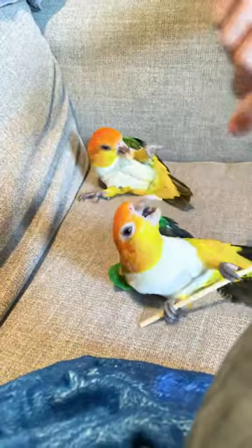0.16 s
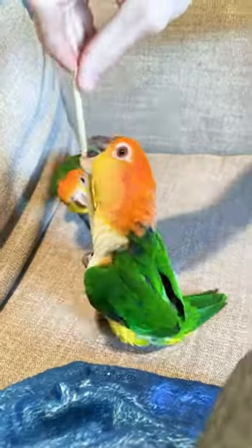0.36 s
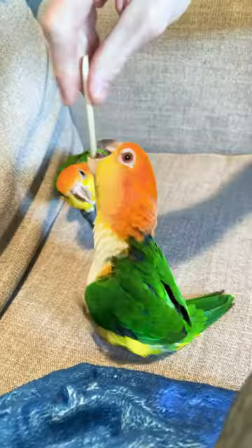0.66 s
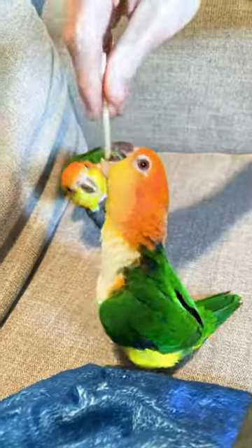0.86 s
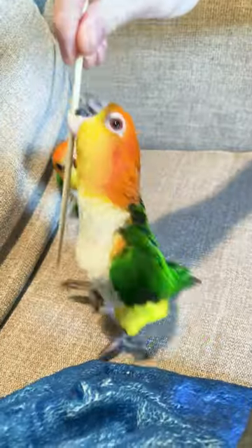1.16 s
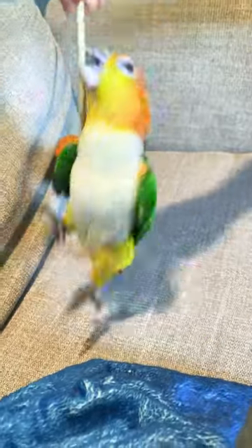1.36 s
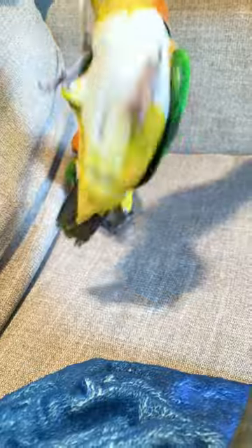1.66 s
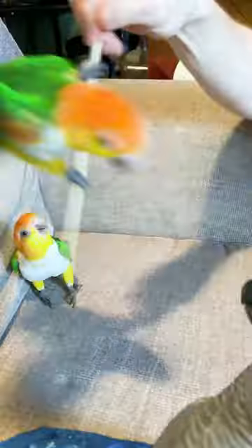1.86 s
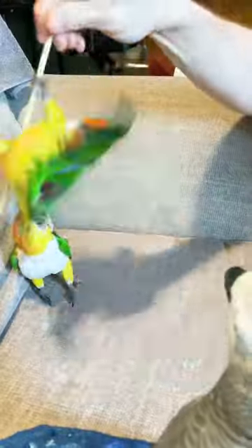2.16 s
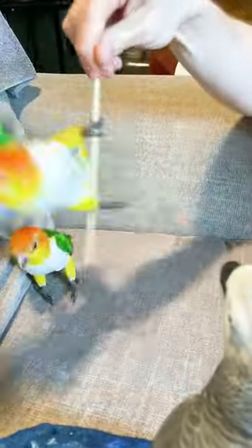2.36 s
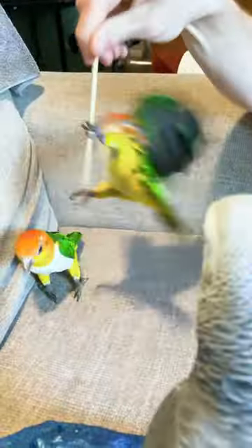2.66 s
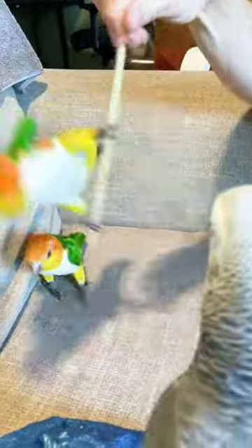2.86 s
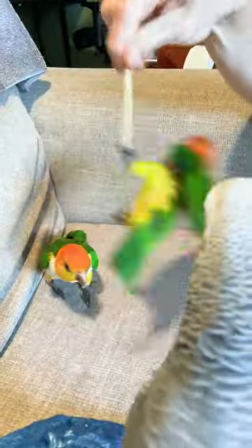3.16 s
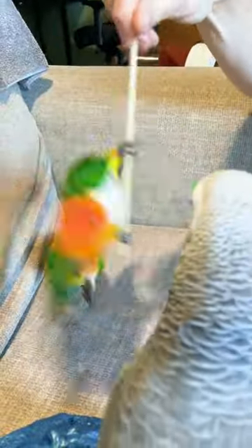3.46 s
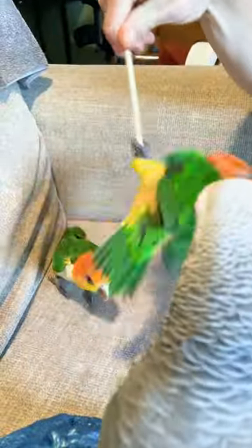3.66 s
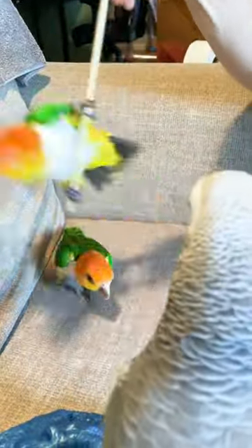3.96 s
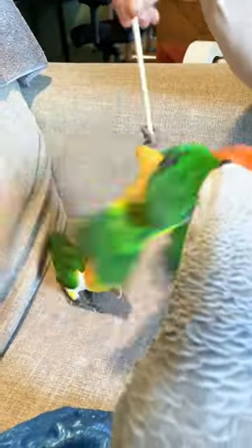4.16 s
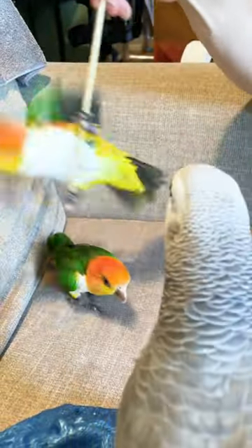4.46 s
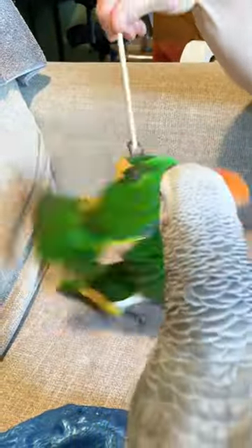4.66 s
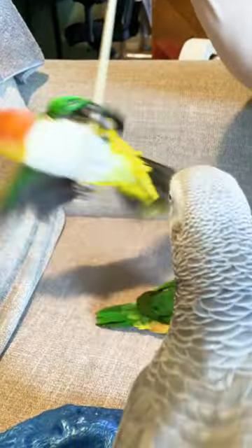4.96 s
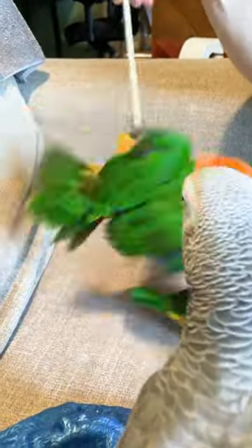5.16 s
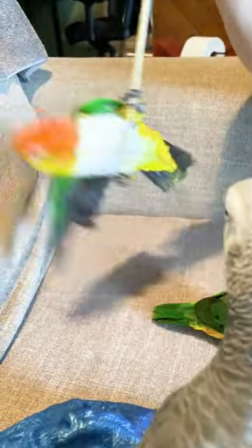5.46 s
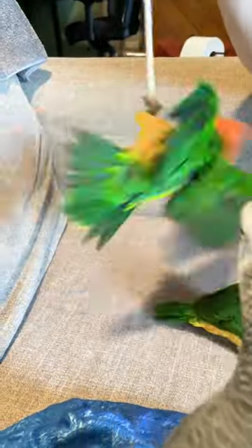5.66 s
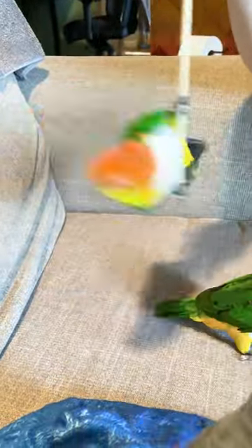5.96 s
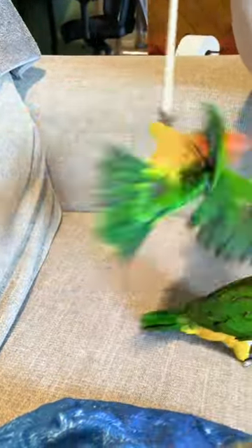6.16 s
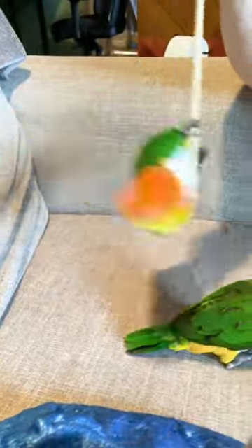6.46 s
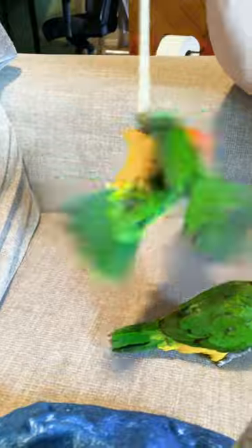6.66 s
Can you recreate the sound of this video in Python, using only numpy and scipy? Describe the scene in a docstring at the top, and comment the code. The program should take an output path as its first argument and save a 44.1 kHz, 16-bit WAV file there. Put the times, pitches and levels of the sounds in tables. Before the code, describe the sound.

Light beak and claw ticks on wood, then a small parrot flapping, with soft bumps on cushions in a quiet room.

```python
"""Small parrots play with a wooden stick held over a sofa; quiet room, faint appliance hum throughout.
First a faint peep. One bird nibbles and climbs the stick: beak and claws tick, plumage slides on cloth.
From 1.9 s it swings from the stick, beating its wings: feathers rustle and zip over the wood, air puffs
reach the microphone, bodies bump the cushions. A thin whine enters at 2.5 s.
After 3 s the wingbeats go on more softly, with scattered scrapes and bumps."""
import sys
import numpy as np
from scipy import signal
from scipy.fft import rfft, irfft
from scipy.io import wavfile
from scipy.ndimage import uniform_filter1d

SR = 44100
rng = np.random.default_rng(int(sys.argv[2]) if len(sys.argv) > 2 else 0)


def waveform_to_disk(signal):
    """Save audio, clipped to [-1, 1], as 16-bit WAV at the path in sys.argv[1]."""
    frames = np.transpose(np.atleast_2d(signal))
    scaled = np.clip(frames, -1, 1) * 32767
    samples = np.round(scaled).astype(np.int16)
    wavfile.write(sys.argv[1], SR, samples)


N = 300762
TIME_S = np.arange(N) / SR

# wing strokes: crest t/s, level/dB, opening/s, folding/s
WINGBEATS = [(1.945, -48, 0.062, 0.062), (2.022, -46.5, 0.045, 0.18), (2.113, -49.5, 0.081, 0.18),
             (2.239, -55, 0.095, 0.061), (2.32, -50, 0.2, 0.071), (2.464, -45, 0.062, 0.085),
             (2.529, -44.5, 0.043, 0.15), (2.605, -53, 0.036, 0.017), (2.735, -52, 0.083, 0.16),
             (2.948, -56, 0.043, 0.16), (3.032, -52, 0.033, 0.064), (3.394, -56.5, 0.1, 0.044),
             (3.951, -58.5, 0.095, 0.12), (4.038, -62, 0.018, 0.091), (4.159, -63.5, 0.11, 0.03),
             (4.279, -63, 0.078, 0.045), (4.445, -59.5, 0.048, 0.032), (4.489, -53, 0.051, 0.049),
             (4.63, -56.5, 0.056, 0.14), (4.739, -56, 0.043, 0.033), (4.962, -56, 0.044, 0.073),
             (5.183, -57, 0.081, 0.079), (5.41, -65.5, 0.093, 0.023), (5.661, -54, 0.082, 0.063),
             (5.781, -59, 0.06, 0.049), (6.149, -53.5, 0.088, 0.12), (6.646, -51.5, 0.081, 0.043),
             (6.751, -50, 0.041, 0.11)]
# plumage sliding on cloth: start t/s, level/dB, length/s
SHUFFLES = [(0.037, -64.5, 0.28), (0.548, -68, 0.16), (0.95, -72.5, 0.2), (1.071, -67.5, 0.35),
            (1.576, -65.5, 0.21), (1.886, -50.5, 0.047), (3.456, -70.5, 0.61), (3.826, -63.5, .1)]
# beak, claw and quill scrapes: crest t/s, rustle level/dB, half-width/s, sizzle level/dB
SCRAPES = [(0.567, -55.5, 0.0082, -72), (0.62, -73, 0.0054, -59), (1.075, -60.5, 0.0067, -41),
           (2.021, -38, 0.0029, -39.5), (2.1993, -37, 0.0021, -55), (2.234, -30, 0.0012, -58),
           (2.316, -36, 0.0012, -55), (2.453, -38, 0.0048, -37), (3.406, -45.5, 0.006, -73),
           (3.959, -42, 0.0069, -72), (4.428, -55.5, 0.013, -58), (4.743, -66, 0.026, -50.5),
           (5.673, -50.5, 0.0064, -70), (6.785, -46.5, 0.0045, -40)]
# feather friction: f/Hz, relative density/dB
FEATHER_SPECTRUM = [(150, 0), (800, -6.5), (1700, -8), (2500, -2.5), (3300, -8.5), (4700, -7.5), (6300, -5),
                    (8800, -7.5), (10500, -.5), (11300, -1.5), (12200, -12), (13500, -24), (15000, -55)]
# feather dragged over an edge: release t/s, level/dB, length/s, final barb rate/Hz, scratch/buzz ratio
ZIPS = [(2.247, -29.5, .017, 2764, 0.52), (2.3265, -27.5, 0.0092, 3142, 0.71),
        (2.834, -35.5, 0.007, 2945, 1.17)]
# beak and claws on the stick: t/s, horn peak/dB, wood re horn/dB, wood f/Hz (set by the grip)
TICKS = [(0.493, -43, -5.5, 1400), (0.495, -47.5, 3.5, 2360), (0.965, -39.5, -11.5, 4000),
         (0.9824, -49.5, 2, 4200), (1.051, -41, -15, 3300), (1.377, -48.5, -4.5, 1550),
         (1.614, -43, -12, 3660), (1.645, -60.5, 11.5, 1280), (1.685, -39.5, -10, 1440),
         (1.703, -43.5, 9, 3540), (2.1898, -43, 9, 1980), (2.3304, -20.5, -32, 2980),
         (2.399, -17, -37, 3640), (2.45, -40, -3, 2300), (2.459, -56, 5, 1450), (2.524, -42, -3, 2520),
         (2.61, -30, -17, 3000), (2.6644, -27.5, -8.5, 1480), (2.766, -30, -23, 2190),
         (3.126, -31, -12, 2680), (3.3158, -31, -6, 2700), (4.404, -52, -1, 3000)]
# stick resonances: multiple of wood f, level/dB, t60/s
STICK_MODES = [(.55, 4, 0.0034), (1, 9.5, 0.0042), (1.85, 15.5, 0.0011)]
# beak and claw resonances: f/Hz, level/dB, t60/s
HORN_MODES = [(5650, -16, 0.0045), (8300, -2, 0.0027), (11100, -4.5, 0.0039)]
# bumps on cushions and hand: t/s, level/dB, f/Hz
BUMPS = [(0.438, -43.5, 233), (0.441, -35, 87), (0.498, -38, 206), (.502, -34.5, 82), (1.069, -38.5, 208),
         (1.825, -42, 415), (2.199, -30.5, 1040), (2.246, -32, 405), (2.459, -27, 814), (2.466, -27.5, 410),
         (2.468, -26.5, 124), (2.524, -31, 363), (2.666, -32.5, 620), (2.677, -37, 465), (2.836, -34, 122),
         (4.04, -39.5, 720), (4.642, -36.5, 643), (4.644, -35, 143), (4.7244, -33, 660), (4.73, -33.5, 108),
         (4.771, -39, 504)]
# air pushed by a wing: crest t/s, level/dB, half-width/s
PUFFS = [(1.905, -35.5, 0.014), (1.945, -37, 0.02), (2.025, -37, 0.028), (2.122, -36.5, 0.023),
         (2.258, -36.5, 0.012), (2.345, -40, 0.019), (2.487, -35.5, 0.018), (2.53, -38, 0.061),
         (2.705, -46.5, 0.12), (2.975, -43.5, 0.037), (4.80, -43.5, 0.019)]
# eddy pressure: f/Hz, relative density/dB
EDDY_SPECTRUM = [(20, -14), (65, 8), (100, -7.5), (200, -13), (400, -31), (1200, -34), (5000, -100)]
# room noise: f/Hz, relative density/dB
ROOM_SPECTRUM = [(20, -6.5), (45, 0), (80, 7.5), (130, 0), (230, -3), (450, -14.5), (900, -22),
                 (2000, -35.5), (8500, -48.5), (11200, -39), (15000, -85)]
# stereo width of room noise: f/Hz, side re mid/dB
ROOM_WIDTH = [(60, -24), (200, -15.5), (620, 2), (2300, -5), (8000, 3)]
# appliance tones: f/Hz, median rms level/dB
HUM_TONES = [(77, -74), (217, -62.5), (355, -75)]
# left microphone port re right: f/Hz, phase lead/rad
PORT_LEAD = [(1600, 0), (3900, .6), (4900, 3.1), (5700, 6.1), (8300, 9), (9500, 9.5), (12000, 12.4)]
# left microphone port re right: f/Hz, level/dB
PORT_BALANCE = [(1500, -1.3), (2600, -1), (4600, -6.5), (5800, -0.5)]


def feathers(grain_db=2, flutter_db=1.5, sheen_db=3.5, max_crackles_per_s=260, crackle_db=-3.5,
             hard_beat_db=-48):
    """Barbs slip past each other in clumps; the harder the stroke, the more the quills crackle."""
    power = sum(wingbeat(*row) ** 2 for row in WINGBEATS) + sum(shuffle(*row) ** 2 for row in SHUFFLES)
    effort = np.hypot(np.sqrt(power), swells([row[:3] for row in SCRAPES]))
    chance = max_crackles_per_s / SR
    caught = rng.random(N) < chance * np.sqrt(np.minimum(effort / from_db(hard_beat_db), 1))
    crackle = from_db(crackle_db) / np.sqrt(chance) * caught * rng.laplace(0, .5, N).clip(-2, 2)
    friction = rng.standard_normal(N) * from_db(grain_db * drift(1100) + flutter_db * drift(90))
    slips = coloured(crackle + friction, FEATHER_SPECTRUM)
    dull = filtered(slips, 1, 4000)
    twist = from_db(sheen_db * drift(50))  # twisting vanes: duller, brighter
    return effort * (dull / twist + (slips - dull) * twist)


def wingbeat(crest_s, db, open_s, fold_s, sweep_s=0.023, open_db=-5.5, fold_db=-5, attack_s=0.011):
    """Envelope of one beat: the wing opens, sweeps through the air and folds."""
    t = TIME_S - crest_s
    unfurled = .5 + .5 * np.tanh((t + open_s) / attack_s)
    opening = unfurled * from_db(open_db * (1 + .5 * np.clip(-2 * t / open_s - 1, -.5, 1)))
    folding = from_db(fold_db) * np.exp(-.5 * np.clip(t / fold_s, 0, 10) ** 2)
    return np.hypot(from_db(db) * np.where(t < 0, opening, folding), swells([(crest_s, db, sweep_s)]))


def shuffle(start_s, db, length_s, attack_s=0.0059, fade_db_per_s=14):
    """Envelope of plumage sliding on cloth: sudden start, slackening end."""
    t = np.clip(TIME_S - start_s, 0, length_s)
    return from_db(db - fade_db_per_s * t) * np.minimum(t / attack_s, 1) * np.sqrt(1 - t / length_s)


def sizzle(band_hz=(9700, 11100), grain_db=-1):
    """Tiny fibres split under each scrape: a high, grainy hiss."""
    grains = rng.standard_normal(N) * from_db(grain_db * drift(900))
    hiss = unit_rms(filtered(grains, 1, band_hz, "band"))
    return hiss * swells([(crest_s, db, width_s) for crest_s, _, width_s, db in SCRAPES])


def zips(start_ratio=.64, jitter=0.13, overtone=0.55, growth=0.74, uneven_db=3, snap=0.7, snap_s=0.001):
    """Uneven barbs flick over an edge, ever faster and harder, until the feather snaps free."""
    out, hiss = np.zeros(N), coloured(rng.standard_normal(N), FEATHER_SPECTRUM)
    wobble, barbs = drift(2000), from_db(uneven_db * drift(2000))
    for release_s, db, length_s, hz, scratch in ZIPS:
        span = np.arange(round((release_s - length_s) * SR), round(release_s * SR))
        progress = np.linspace(0, 1, len(span))
        rate_hz = hz * (start_ratio + (1 - start_ratio) * progress ** 2) * (1 + jitter * wobble[span])
        phase = 2 * np.pi * np.cumsum(rate_hz) / SR
        buzz = barbs[span] * (np.sin(phase) + overtone * (np.sin(2 * phase) + np.sin(3 * phase)))
        crack = scratch + snap * np.exp((TIME_S[span] - release_s) / snap_s)
        push = progress ** growth * np.minimum(1, (1 - progress) * 20)
        out[span] += from_db(db) * push * (buzz + crack * hiss[span])
    return out


def ticks(crumble=0.25, crumble_s=0.0011, lead_s=0.00073, horn_cutoff_hz=13200, wood_cutoff_hz=8000):
    """Fibres give way around each sharp contact, which rings in horn and wood."""
    out, t = np.zeros(N), TIME_S[:SR // 50]
    for start_s, db, wood_db, hz in TICKS:
        bite = crumble * rng.standard_normal(len(t)) * np.exp(-np.abs(t - lead_s) / crumble_s)
        bite[round(lead_s * SR)] = 1
        wood_modes = [(hz * multiple, mode_db, t60_s) for multiple, mode_db, t60_s in STICK_MODES]
        wood = struck(bite, wood_modes, wood_cutoff_hz)
        horn = struck(bite, HORN_MODES, horn_cutoff_hz)
        add(out, start_s, from_db(db) * (horn + from_db(wood_db) * wood))
    return out


def struck(force, modes, cutoff_hz):
    """Damped modes ring under a slightly soft contact; peak 1."""
    sound = 0
    for k, (hz, db, t60_s) in enumerate(modes):
        radius, angle = from_db(-60 / (t60_s * SR)), 2 * np.pi * hz / SR
        feedback = [1, -2 * radius * np.cos(angle), radius ** 2]
        sound += (-1) ** k * from_db(db) * signal.lfilter([0, np.sin(angle)], feedback, force + 1e-18)
    sound = filtered(sound, 4, cutoff_hz)
    return sound / np.max(np.abs(sound))


def bumps(sag=0.085, scuff=0.43, attack_cycles=0.2, t60_cycles=9.4):
    """A padded blow rings briefly with a dull scuff; its pitch sinks as the cloth gives."""
    out, t = np.zeros(N), TIME_S[:SR // 5]
    for start_s, db, hz in BUMPS:
        attack = 1 - np.exp(-hz * t / attack_cycles)
        fade = from_db(-60 * t * hz / t60_cycles)
        tone = np.sin(2 * np.pi * np.cumsum(hz * (1 - sag * (1 - fade))) / SR)
        cloth = unit_rms(filtered(rng.standard_normal(len(t)), 2, [hz / 2, hz * 2], "band"))
        add(out, start_s, from_db(db) * attack * fade * (tone + scuff * cloth))
    return out


def puffs():
    """Eddies shed by the wings press on the microphone in smooth swells."""
    eddies = coloured(rng.standard_normal(N), EDDY_SPECTRUM)
    local_rms = np.sqrt(uniform_filter1d(eddies ** 2, size=1400) + 1e-6)
    return swells(PUFFS) * eddies / local_rms


def peep(crest_s=.108, db=-60, width_s=.028, crest_hz=1370, fall_hz_per_s=1800, waver=0.042, rough_db=6):
    """A faint, rough, falling note."""
    pitch_hz = (crest_hz - fall_hz_per_s * (TIME_S - crest_s)) * (1 + waver * drift(425))
    envelope = swells([(crest_s, db, width_s)]) * from_db(rough_db * drift(220))
    return envelope * np.sin(2 * np.pi * np.cumsum(pitch_hz) / SR)


def room_noise(db=-53, split_hz=150, rumble_fall_db_per_s=0.56, hiss_rise_db_per_s=0.12):
    """Low diffuse noise that slowly turns lighter."""
    mid, side = (from_db(db) * coloured(rng.standard_normal(N), ROOM_SPECTRUM) for _ in range(2))
    side = irfft(rfft(side) * from_db(on_bins(ROOM_WIDTH)), N)
    noise = mid + side * [[1], [-1]]
    rumble = filtered(noise, 1, split_hz)
    t = TIME_S - TIME_S.mean()
    return rumble * from_db(-rumble_fall_db_per_s * t) + (noise - rumble) * from_db(hiss_rise_db_per_s * t)


def hum(waver_db=3.5, wander_rad=1.6, whine_hz=1184, whine_db=-83, whine_start_s=2.5):
    """Appliances hum, wavering in level and phase; a thin whine fades in."""
    def tone(hz, db, spread_rad):
        amplitude = np.sqrt(2) * from_db(db + waver_db * drift(11))
        return amplitude * np.sin(2 * np.pi * hz * TIME_S + spread_rad * drift(7))
    drone = sum(tone(hz, db, wander_rad) for hz, db in HUM_TONES)
    fade_in = np.clip(2 * (TIME_S - whine_start_s), 0, 1)
    return drone + fade_in * tone(whine_hz, whine_db, 2 * wander_rad)


def reverb(x, t60_s=0.15, wet_db=-13):
    """Short diffuse room tail, different on each side."""
    t = TIME_S[:SR // 2]
    tail = rng.standard_normal((2, len(t))) * from_db(-60 * t / t60_s) * (t > .002)
    response = from_db(wet_db) * unit_rms(tail) / np.sqrt(len(t))
    return signal.fftconvolve(x[None], response, axes=1)[:, :N]


def ports(x):
    """Sound reaches the left microphone port first; each port colours it."""
    lean = from_db(on_bins(PORT_BALANCE) / 2)
    return irfft(rfft(x) * np.array([lean, np.exp(-1j * on_bins(PORT_LEAD)) / lean]), N)


def from_db(db):
    """Decibels to gain."""
    return 10 ** (np.asarray(db) / 20)


def unit_rms(x):
    """Scale to rms 1."""
    return x / np.sqrt(np.mean(x ** 2) + 1e-20)


def filtered(x, order, hz, kind="low"):
    """Maximally flat filter."""
    return signal.sosfilt(signal.butter(order, hz, kind, fs=SR, output="sos"), x)


def on_bins(points):
    """Interpolate a table over log frequency at every FFT bin."""
    hz, value = np.transpose(points)
    return np.interp(np.log(np.arange(N // 2 + 1) * SR / N + 1), np.log(hz), value)


def coloured(x, spectrum):
    """Shape by a spectrum; rms 1."""
    return unit_rms(irfft(rfft(x) * from_db(on_bins(spectrum)), N))


def drift(knots_per_s):
    """Random line-segment curve; rms 1."""
    return unit_rms(np.interp(TIME_S * knots_per_s, np.arange(8000), rng.standard_normal(8000)))


def swells(rows):
    """Sum of bell-shaped gains; width is the half-width at 1/e."""
    return sum(from_db(db) * np.exp(-np.minimum(((TIME_S - crest_s) / width_s) ** 2, 100))
               for crest_s, db, width_s in rows)


def add(track, start_s, sound):
    """Mix a short sound into a track."""
    at = max(round(start_s * SR), 0)
    track[at:at + len(sound)] += sound[:max(N - at, 0)]


def scene(left_db=0.44, eddy_side_db=-9):
    """Birds close and ahead; low sounds lean left; eddies differ at each port."""
    birds = feathers() + sizzle() + zips() + ticks() + peep()
    thuds = bumps()
    draught = puffs() + from_db(eddy_side_db) * puffs() * [[1], [-1]]
    lows = (ports(thuds) + draught + room_noise() + hum()) * from_db([[left_db], [-left_db]])
    return ports(birds) + reverb(birds + 2 * thuds) + lows


def record(dry, cutoff_hz=15000):
    """Steep low-pass."""
    return signal.sosfilt(signal.ellip(10, .1, 80, cutoff_hz, fs=SR, output="sos"), dry)


dry = scene()
out = record(dry)
waveform_to_disk(out)
```